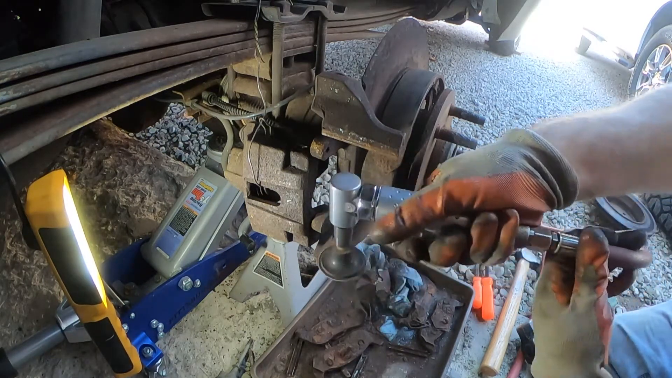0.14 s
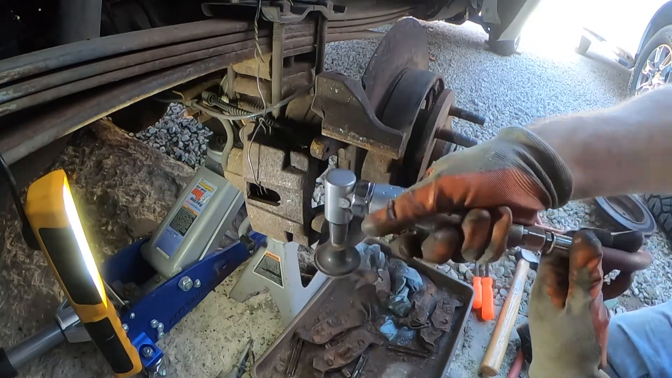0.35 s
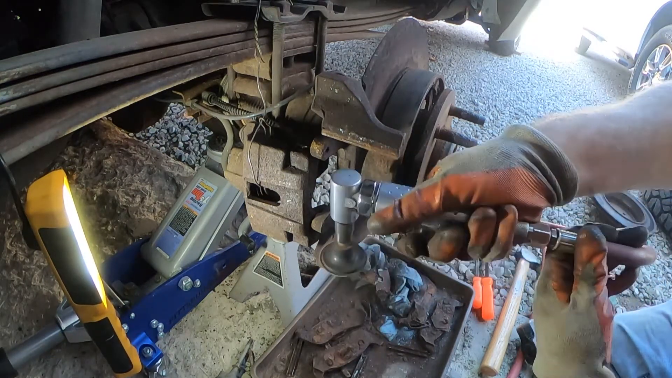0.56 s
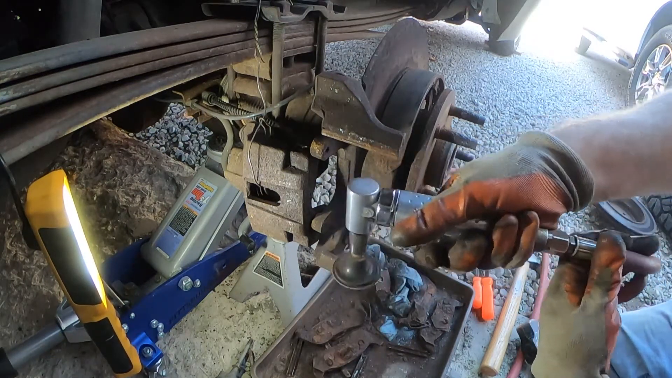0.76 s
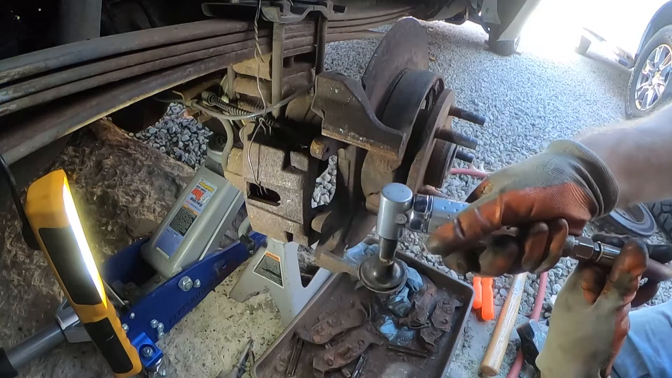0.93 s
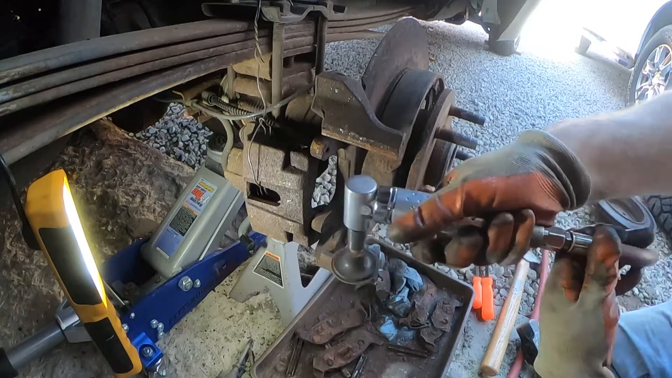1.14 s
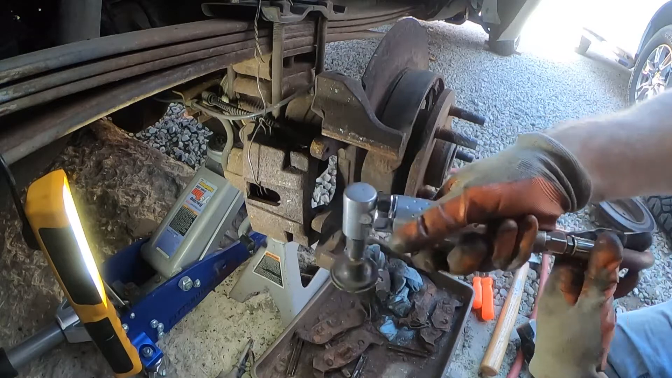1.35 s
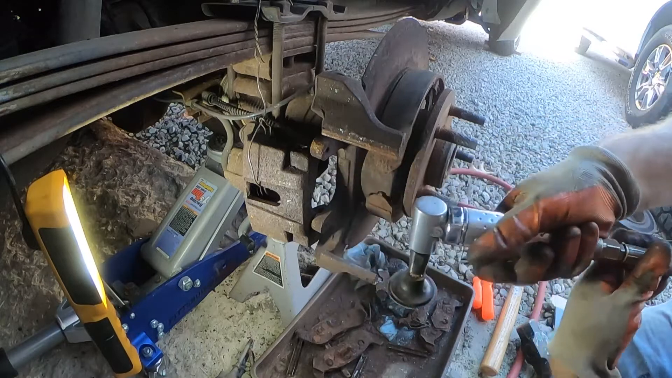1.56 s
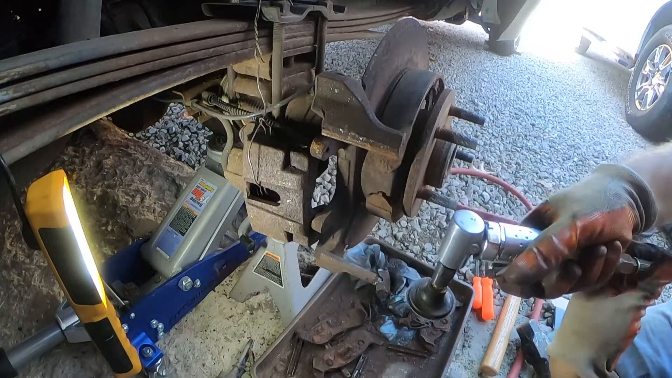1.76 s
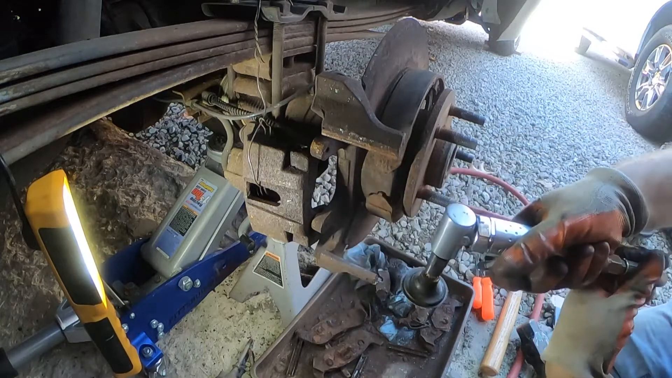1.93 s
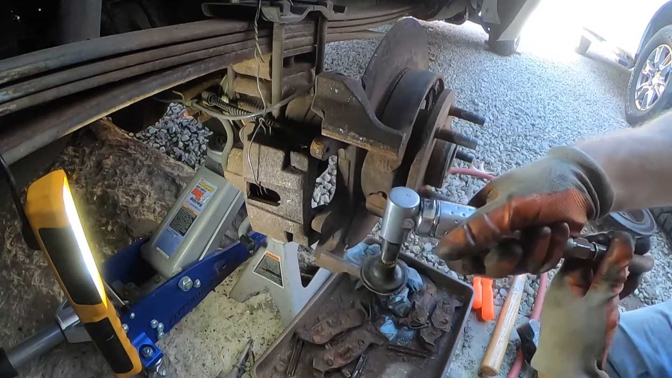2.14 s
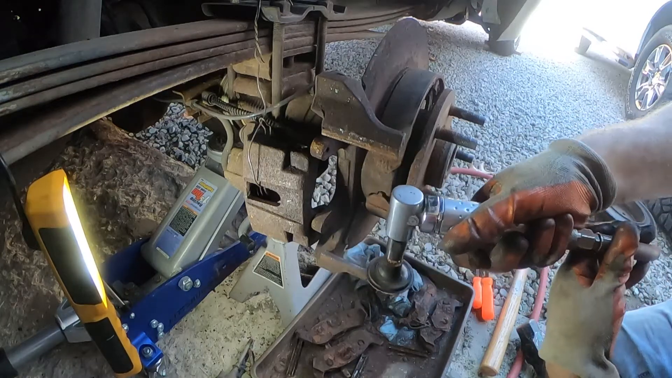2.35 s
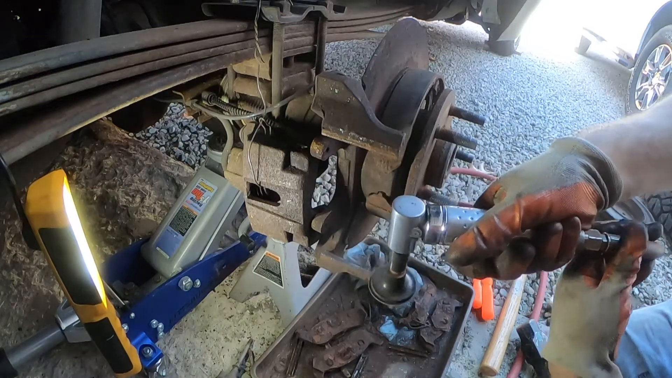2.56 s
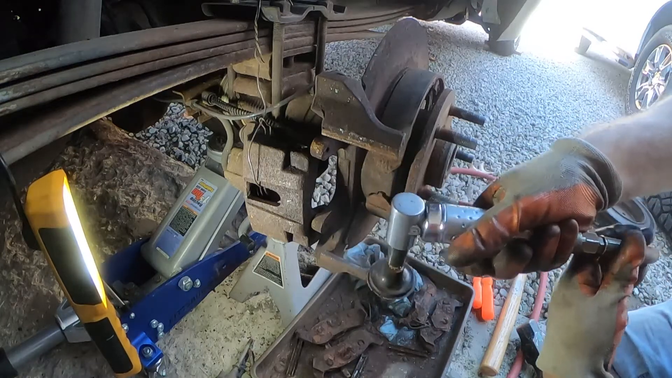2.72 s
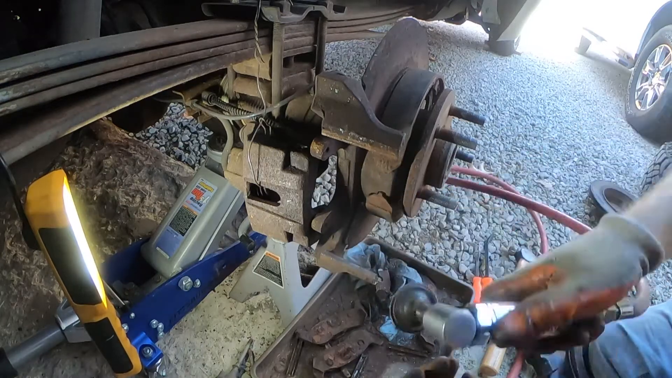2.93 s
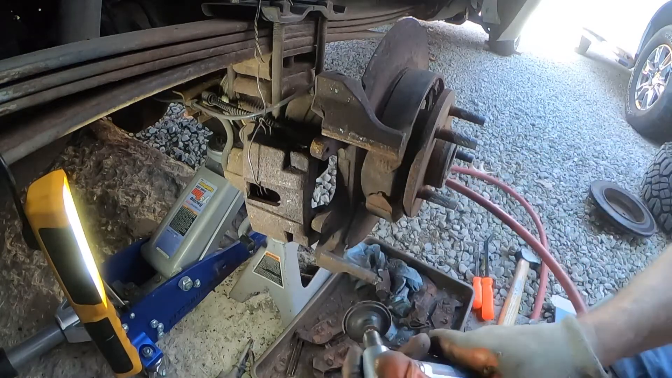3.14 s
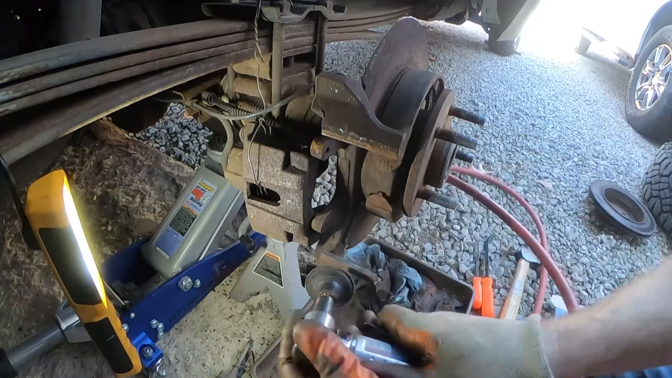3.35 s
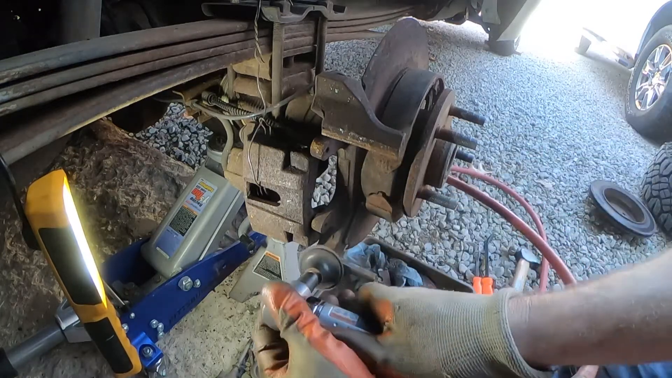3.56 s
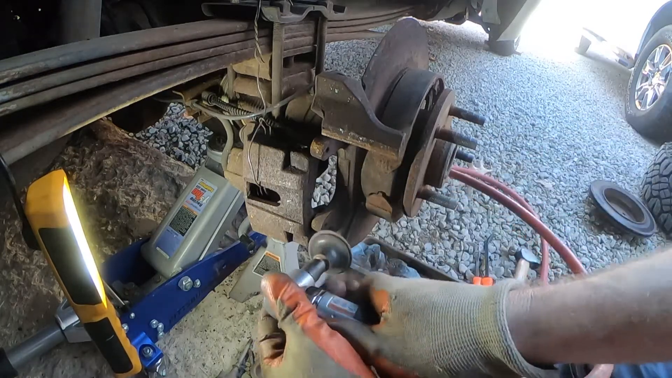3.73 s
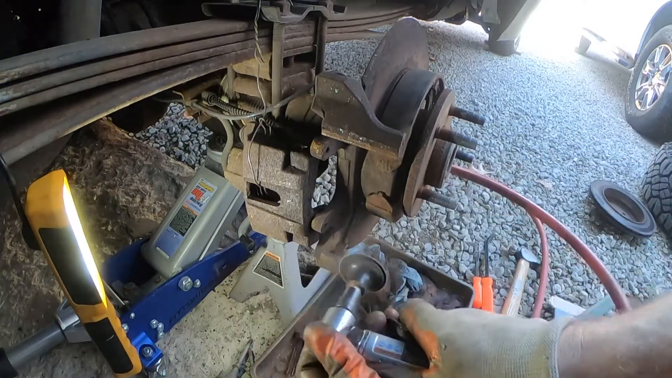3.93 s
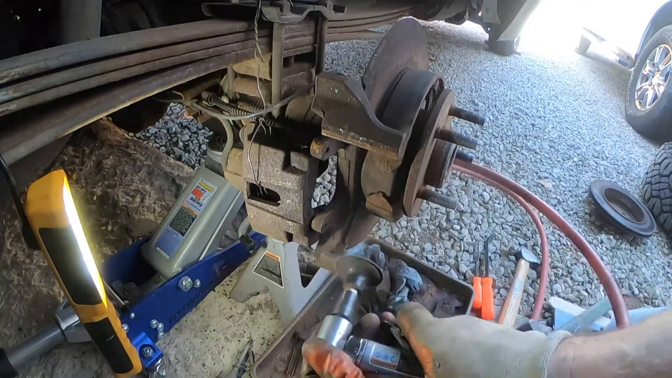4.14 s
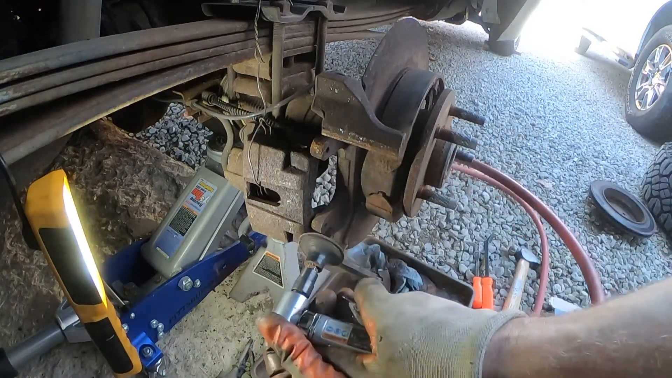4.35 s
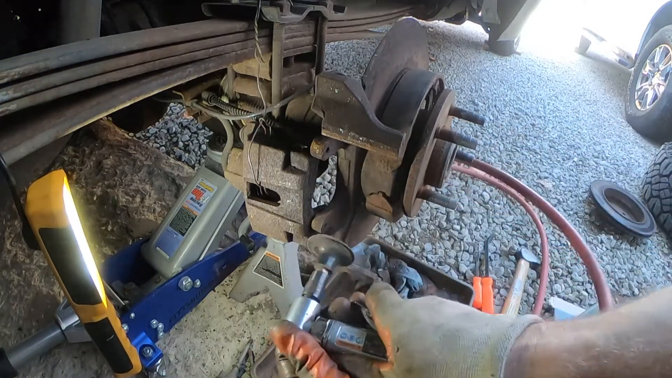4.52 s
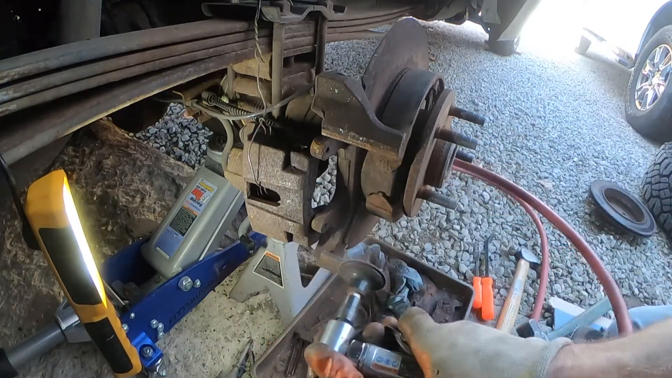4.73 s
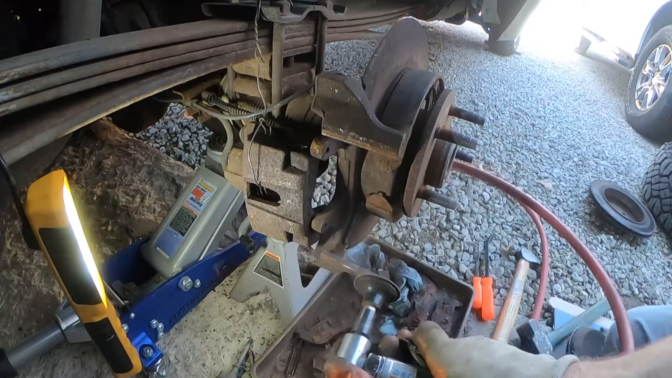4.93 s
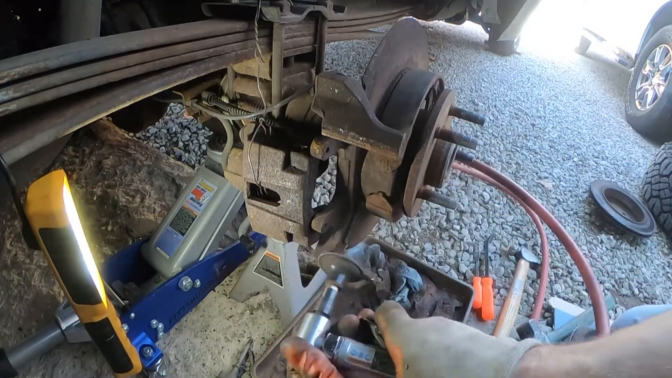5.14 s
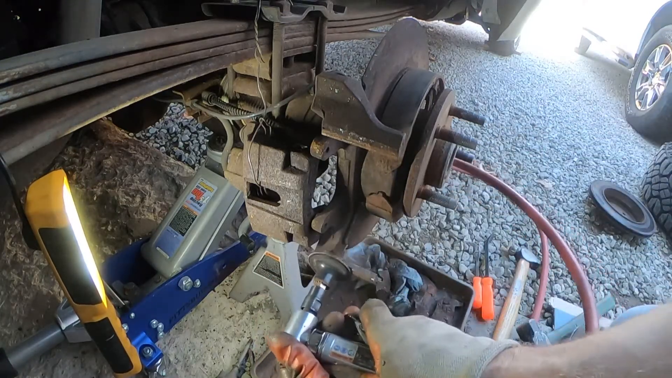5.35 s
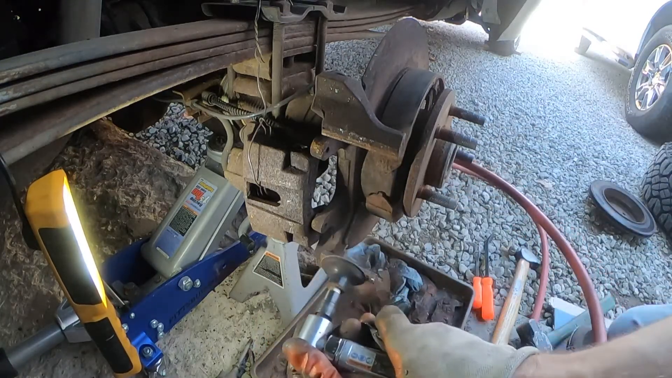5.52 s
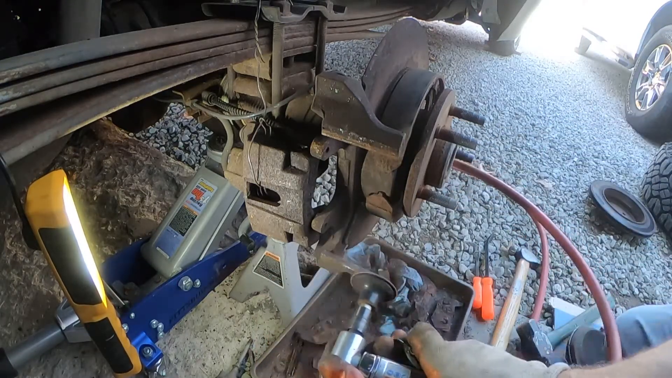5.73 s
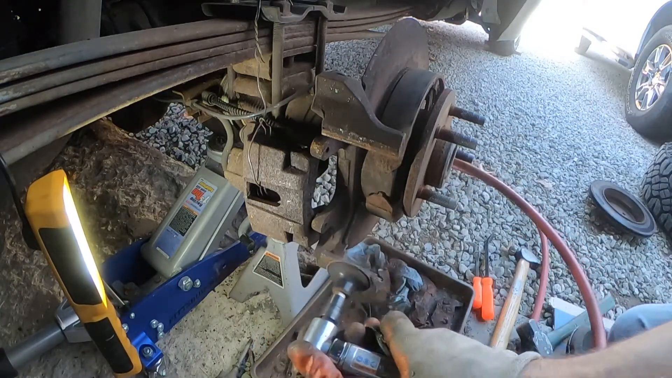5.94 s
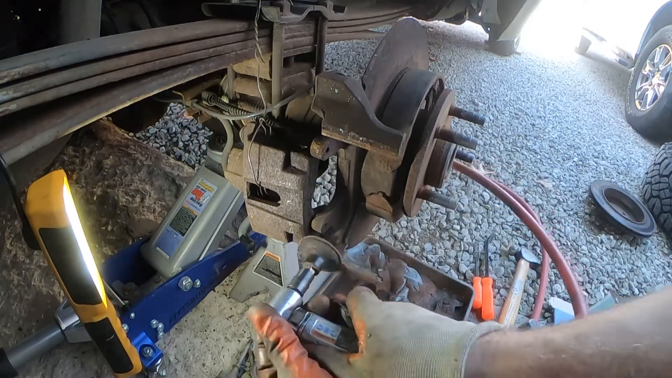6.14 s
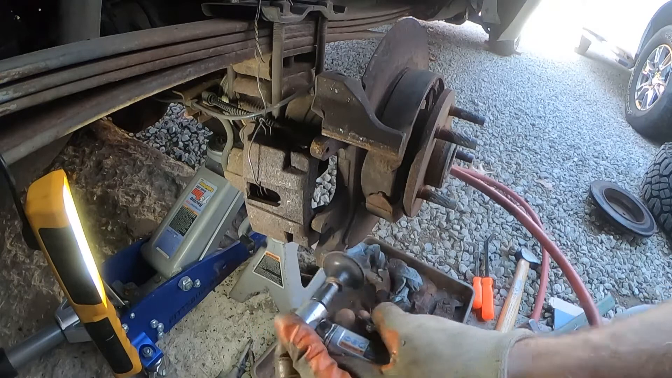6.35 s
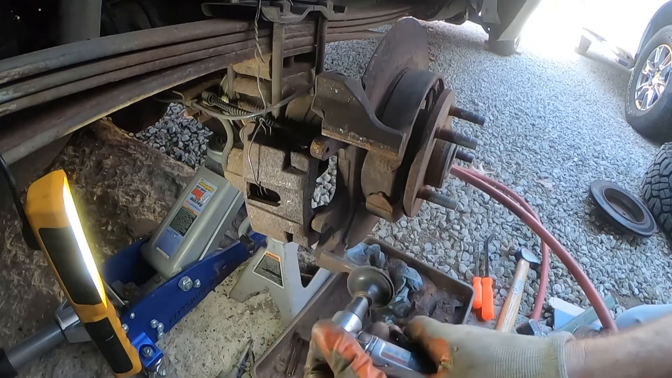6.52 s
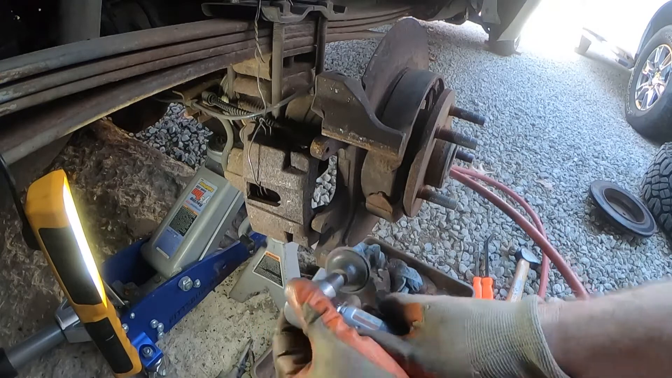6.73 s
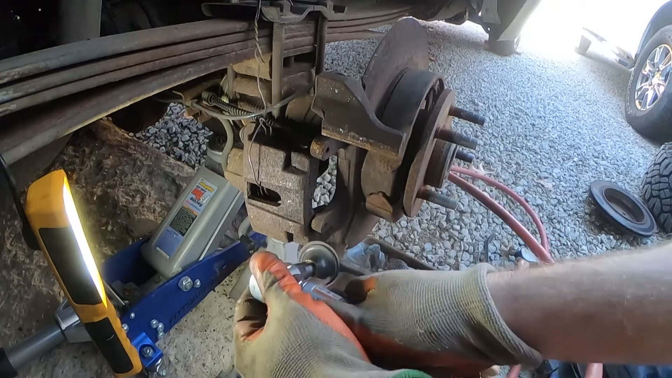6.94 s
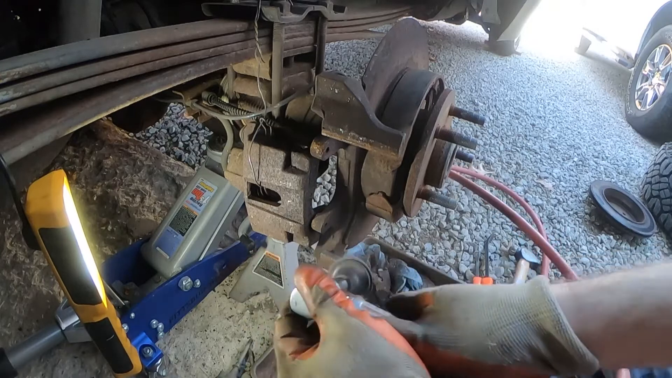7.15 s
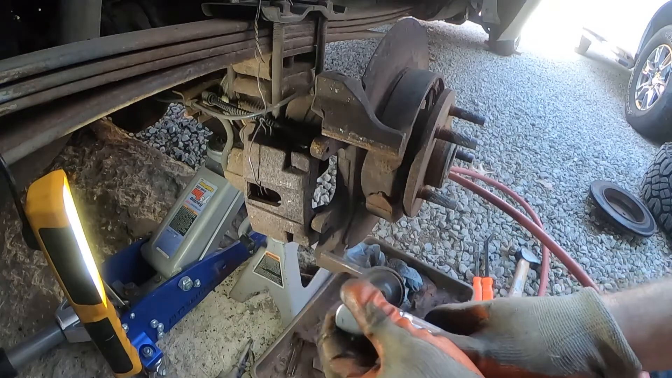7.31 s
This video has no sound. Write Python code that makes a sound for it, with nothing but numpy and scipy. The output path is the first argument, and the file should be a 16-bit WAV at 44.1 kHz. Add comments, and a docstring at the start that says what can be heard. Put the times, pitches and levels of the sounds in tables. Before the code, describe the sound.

Close up, a small air grinder already running whines unevenly and winds down, then revs briefly again. Air leaks in a hiss, a hard metallic clack lands, and a short rev follows. After a hissing pause come five more revs, rougher, with chatter on the way up and down and a buzzing rasp near top speed. Sheltered outdoor spot under a vehicle, short reflections, close stereo microphone.

```python
"""Air-driven die grinder revved near a rusty bracket

An angle die grinder with a small sanding disc is revved in eight bursts, the first already running.
Its vanes chop the air into a harmonic whine, and turbulent exhaust hisses in puffs at the vane rate.
Later the head chatters at middling speed and the disc rasps near the top, as random impacts on resonances.
Leaking air is shaped noise with moving resonances; one clack excites decaying modes, then a dull rumble."""
import sys
import numpy as np
from scipy import signal
from scipy.fft import rfft, irfft
from scipy.io import wavfile
from scipy.ndimage import uniform_filter1d, minimum_filter1d

SR = 44100
rng = np.random.default_rng(int(sys.argv[2]) if len(sys.argv) > 2 else 0)


def wav_record(signal):
    """Record a signal, one row per channel, as 16-bit PCM in the file named by sys.argv[1]."""
    frames = np.transpose(np.atleast_2d(signal))
    bounded = np.clip(frames, -1, 1)
    # unit amplitude maps onto the largest positive 16-bit level
    quanta = np.round(bounded * 32767).astype(np.int16)
    wavfile.write(sys.argv[1], SR, quanta)


N = 329868
T = np.arange(N) / SR  # t/s
HZ = np.fft.rfftfreq(N, 1 / SR)  # f/Hz

# Presses of the throttle: [opens t/s, shut t/s, attack/s, release/s,
# relative air level/dB, whine offset/dB, start-up jolt level/dB]
BURSTS = [(-.2, 0.948, .03, 0.17, -25, -4, -60), (1.017, 1.443, 0.049, 0.21, -25, -4, -53),
          (2.395, 2.759, .018, .17, -23.5, -1, -45), (3.518, 4.423, .012, 0.094, -23.5, -2, -48),
          (4.535, 5.322, .03, 0.11, -25, -2, -42), (5.459, 6.241, .024, 0.11, -24, -0.5, -49),
          (6.335, 7.02, .035, 0.13, -23, -2, -39.5), (7.139, 7.53, 0.063, 0.093, -25.5, -1, -38)]
SHUT_DB, RELEASE_BEND = -22, 1.58  # air at the ends of a press against its hold; the release starts gently

# Motor speed, one track per burst: [t/s, vane rate f/Hz]
SPEEDS = [
    [(0.0, 600.5), (0.082, 673), (0.116, 690), (0.188, 570.6), (0.352, 628), (0.384, 537), (0.41, 481),
     (0.496, 464), (0.608, 626.1), (0.71, 415.5), (0.776, 345.6), (0.816, 268), (0.87, 156.1)],
    [(1.07, 131.3), (1.106, 279.3), (1.156, 454.5), (1.244, 622.6), (1.312, 395), (1.36, 192)],
    [(2.42, 137.8), (2.44, 280), (2.472, 495), (2.55, 680.5), (2.598, 579), (2.66, 286), (2.7, 218.7)],
    [(3.53, 100.9), (3.544, 187.8), (3.566, 325.7), (3.598, 528), (3.656, 700), (3.714, 731),
     (3.822, 267.8), (3.914, 418.6), (4.076, 613), (4.158, 666.7), (4.32, 467.6), (4.348, 370.7),
     (4.38, 262)],
    [(4.59, 98.5), (4.618, 169.2), (4.668, 296.4), (4.722, 459.8), (4.776, 585.4), (5.068, 734),
     (5.124, 660), (5.224, 380), (5.254, 279), (5.29, 154.4)],
    [(5.49, 101.1), (5.514, 205.4), (5.548, 360.6), (5.612, 497), (5.76, 685.4), (5.922, 693.4),
     (6.044, 535.3), (6.13, 297.7), (6.2, 123.1)],
    [(6.38, 105.2), (6.404, 175.6), (6.438, 275.3), (6.486, 409.2), (6.548, 588.9), (6.616, 637),
     (6.678, 631.4), (6.9, 480.7), (6.96, 294.9)],
    [(7.21, 107.0), (7.248, 246.1), (7.316, 485.9), (7.384, 602.4), (7.48, 282.4)],
]
EDGE_SLOPE_HZ_PER_S, CREEP_HZ = 2600, 40.17  # slope of the vane rate outside each track, and its lower bound
INERTIA_S = 0.013  # the rotor rounds off every change of speed
COAST_HZ_PER_S = 7500  # fall of the vane rate that counts as full coasting
TURNED_S = 3.73  # the tool is turned over from here on

# Whine fundamental: [vane rate f/Hz, upright relative level/dB, turned-over relative level/dB]
WHINE = [(100, -35, -55), (199.37, -41.5, -40.5), (284.8, -41.5, -45.5), (398, -19.5, -27),
         (483, -27.5, -30), (560, -21, -23.5), (620, -25.5, -25), (750.3, -18, -26.5)]
COAST_DB, OVERTONE_COAST_DB = -9, -12.5  # change of the whine, and of its overtones, at full coasting
FLARE_S, FLARE_WIDTH_S, FLARE_DB = 2.598, 0.015, 13  # the whine flares once
# Vane harmonics leaving the exhaust port: [f/Hz, upright relative level/dB, turned-over relative level/dB]
OVERTONES = [(296, -40, -53.5), (600.3, -30, -29), (751.1, -37, -38), (1080, -35, -42.5),
             (1213, -29.5, -38), (1590, -30, -31.5), (2040, -36.5, -35.5), (2500, -34, -31),
             (4500, -41, -53)]
PHASE_JITTER_RAD, FLUTTER_DB, FLUTTER_HZ = 0.3, 1.5, 12

# Correlation of the two channels, general: [f/Hz, likeness from -1 to 1]
LIKENESS = [(60, 0.98), (600, 0.9), (1200, -0.43), (2400, 0.83), (4400, 0.8), (8000, -0.16), (15000, 0.22)]
# Exhaust spectrum: [f/Hz, relative spectral level/dB]
EXHAUST = [(30, -52), (65, -6.5), (130, -5.5), (300, -9.5), (600, -10), (900, -9.5), (1400, -3.5),
           (1800, 5), (2400, 3), (4000, 4.5), (6500, 3.5), (10000, 1), (11300, -8), (15500, -20)]
# Exhaust balance: [f/Hz, left minus right level/dB]
EXHAUST_SIDE = [(100, -1.5), (2400, 0), (8000, -1.5), (15000, -1)]
HISS_DIP_DB = -4  # the hiss dips while the disc rasps

# Leaking-air spectrum: [f/Hz, relative spectral level/dB]
LEAK_COLOUR = [(100, -10), (600, -15), (900, -10.5), (1300, -5.5), (2200, 2.5), (3300, 3.5), (4300, 3),
               (6000, 4), (7600, 6), (10200, 5), (11400, -4.5), (15500, -16.5)]
# Leaking-air balance: [f/Hz, left minus right level/dB]
LEAK_SIDE = [(100, 3), (1300, -10), (2400, -6), (4400, -1.5), (15000, -2.5)]
# Leaking-air channel correlation: [f/Hz, likeness from -1 to 1]
LEAK_LIKENESS = [(100, 0.94), (640, 0.73), (1300, -0.44), (2400, 0.23), (4400, 0.51), (7500, -0.58),
                 (15000, .05)]
# Surges of leaking air: [start t/s, end t/s, initial gain level/dB]
SURGES = [(1.483, 2.287, -32.5), (2.74, 3.65, -28.5), (6.106, 6.498, -37), (7.01, 7.5, -33.5)]
LEAK_DB, LEAK_RISE_S, LEAK_FALL_S, LEAK_SAG_DB_PER_S = -39, 0.14, 0.16, -9
SWING_S, SWING_WIDTH_S, SWING_HZ, SWING_DB = 3.0, 0.13, 1087, 3.5  # rise as the hand swings the tool round
JET_HZ, JET_DB, JET_WIDTH_HZ = 1742, -10, 500  # resting resonance, relative level, half-width
UPPER_JET_RATIO, UPPER_JET_DB = 1.55, -5.5  # a weaker resonance above it

# Low background rumble: [t/s, level/dB before the trim]
RUMBLE = [(0.0, -58), (1.39, -45), (2.04, -69), (2.23, -42.5), (3.27, -58), (3.56, -49.5), (3.69, -74),
          (3.75, -57.5), (7.48, -43)]
RUMBLE_TRIM_DB = 4.5
# Background spectrum: [f/Hz, relative spectral level/dB]
FLOOR = [(20, -45), (45, -17), (70, 2.5), (110, -7), (200, -21.5), (400, -17), (1000, -20), (4000, -16),
         (15000, -53)]

# Dull spectrum of the jolts and of the rumble after the clack: [f/Hz, relative spectral level/dB]
THUD = [(40, -10), (100, 16), (240, 11), (420, 2.5), (700, -19), (2000, -28), (8000, -78)]
JOLT_DELAY_S, JOLT_WIDTH_S = 0.1, 0.08
# Resonances of the hum and of the burr: [f/Hz, width f/Hz, relative level/dB]
HUM_MODES = [(248.8, 1.8, 7.5), (389, 63, -11.0)]
BURR_MODES = [(640, 84, 0)]

# Brief gear rattles as the throttle is eased: [start t/s, length t/s, gain level/dB]
RATTLES = [(0.122, 0.063, -26), (0.347, 0.064, -27), (0.607, 0.049, -26), (1.238, 0.054, -25),
           (3.71, 0.17, -37), (4.255, 0.14, -39)]
# Knocks of the chattering head: [f/Hz, relative spectral level/dB]
CHATTER = [(300, -41), (1500, -65), (2500, 3), (2950, 4.5), (3500, 13.5), (4000, -10.5), (4600, -48),
           (5200, -23), (6500, -29), (12000, -23)]
# Resonances of the head: [f/Hz, width f/Hz, relative level/dB]
HEAD_MODES = [(2950, 23, 10.5), (3189, 26, 12), (3520, 138.4, -33), (5210, 490, 0.5)]
# Bright ring of the head: [f/Hz, width f/Hz, relative level/dB]
BRIGHT_MODES = [(3940, 27, 2.7), (4056, 46, 2)]
CHATTER_DB, SLACK_DB = -26.5, 3  # base chatter gain; extra at the whirl rate while slowing
WHIRL_HZ, WHIRL_WIDTH_HZ, WHIRL_DB = 308, 250, 5  # vane rate of strongest chatter, its width, its rise

# The clack and its bounces: [t/s, blow level/dB]
CLACKS = [(2.167, -3.5), (2.171, -18), (2.178, -25), (2.189, -22)]
# Resonances of the clack: [f/Hz, width f/Hz, relative level/dB]
CLACK_MODES = [(1170, 240, -16), (1944, 81, 6), (2320, 320, 7.5), (3350, 210, 6.5), (4140, 310, -12)]
# Dull rumble after the clack: [t/s, level/dB]
THUD_SWELL = [(2.165, -78), (2.188, -32.5), (2.24, -35), (2.3, -42), (2.4, -57), (2.5, -90)]

# Rasping near top speed: [start t/s, end t/s, rasp gain/dB before its weight, bright-ring gain/dB]
RASPS = [(3.971, 4.223, -20.5, -32), (4.758, 5.15, -24.5, -29.5), (5.649, 6.0, -24.5, -29),
         (6.507, 6.753, -20.5, -33.5), (7.329, 7.518, -24, -25)]
RASP_EDGE_S = 0.047
# Rasp spectrum: [f/Hz, relative spectral level/dB]
RASP = [(100, -54), (240, -5), (500, 3), (1000, -43), (1400, 15), (1900, -10), (2400, 11), (3200, 21),
        (4100, -30.5), (4600, -52), (9000, -50)]
# Resonances of the disc: [f/Hz, width f/Hz, relative level/dB]
DISC_MODES = [(1809, 60, 0.5), (1964, 62, 4.5), (2332, 18, 2.5), (2770, 29, -5.5)]
IDLE_RASP_DB, IDLE_RING_DB = -34, -37  # gain floors of the disc and the bright ring

EDGE_HZ = 15550  # upper band limit


def amp(db):
    """Amplitude ratio from a level in decibels."""
    return 10 ** (np.asarray(db) / 20)


def unit(x):
    """Normalisation to unit root-mean-square value."""
    return x / np.sqrt(np.mean(x ** 2) + 1e-20)


def read(points):
    """Interpolation of a spectrum on a logarithmic frequency axis."""
    hz, value = np.transpose(points)
    return np.interp(np.log(HZ + 1), np.log(hz + 1), value)


def curve(rows, column):
    """Linear interpolation of one table column in time."""
    rows = np.asarray(rows)
    return np.interp(T, rows[:, 0], rows[:, column])


def bell(x, centre, width):
    """Gaussian bump of unit height."""
    return np.exp(-((x - centre) / width) ** 2)


def fade_in(s):
    """Linear gain ramp that opens at a given moment."""
    return np.clip((T - s) / 0.022, 0, 1)


def spell(start, end, rise_s, fall_s):
    """Trapezoidal gain: rise, hold and fall between two moments."""
    return np.clip(np.minimum((T - start) / rise_s, (end - T) / fall_s), 0, 1)


def noise():
    """Two independent white Gaussian noises."""
    return rng.standard_normal((2, N))


def wander(rate_hz):
    """Low-passed random fluctuation of unit size."""
    spectrum = rfft(rng.standard_normal(N))
    return unit(irfft(spectrum / (1 + (HZ / rate_hz) ** 4), N))


def ringing(modes):
    """Modal superposition: a frequency response of resonances, dull above the highest."""
    top_hz = max(hz for hz, _, _ in modes)
    response = sum(amp(db) / (1 + 2j * (HZ - hz) / width) for hz, width, db in modes)
    return response / (1 + (HZ / top_hz / 1.05) ** 8)


def colour(drive, response, side_db=0, likeness=LIKENESS):
    """Linear filtering of two unrelated drives, mixed to a set correlation between the channels."""
    a, b = rfft(drive) * response
    same = np.clip(read(likeness), -1, 1)
    mid = a * np.sqrt(1 + same)
    side = b * np.sqrt(1 - same)
    left = (mid + side) * amp(side_db / 2)
    right = (mid - side) * amp(-side_db / 2)
    return unit(irfft(np.array([left, right]), N))


def small_impacts(turns, per_s, spread_db, throb):
    """Random point process of small impacts, crowded on one side of each shaft turn."""
    crowding = 1 + np.clip(throb, 0, 1) * np.cos(2 * np.pi * turns)
    hits = rng.random((2, N)) < per_s / SR * crowding
    return hits * noise() * amp(spread_db * wander(630))


def garage(x, t60, wet_db):
    """Diffuse reverberation: short, exponentially decaying echoes from the underbody and the floor."""
    t = T[:SR // 2]
    tail = rng.standard_normal((2, len(t))) * amp(-60 * t / t60) * (t > 0.001)
    tail = tail + 0.52 * tail[::-1]  # each channel shares some of the other's echoes
    wet = signal.fftconvolve(x, tail / np.linalg.norm(tail[0]), axes=1)[:, :N]
    return x + amp(wet_db) * wet


def echoed(x, share):
    """Early reflections off the hand and the hub give the hiss a hollow grain."""
    return unit(garage(x, t60=0.035, wet_db=20 * np.log10(share)))


def press(start, end, attack_s, release_s):
    """Gain of one throttle press: attack, hold and release shaped in decibels."""
    opening = np.clip(1 - (T - start) / attack_s, 0, 4)
    closing = np.clip(1 - (end - T) / release_s, 0, 4)
    return amp(SHUT_DB * (opening + closing ** RELEASE_BEND))


def airflow():
    """Throttled flow: relative level in dB of the air let through."""
    flow = sum(amp(db) * press(*timing) for *timing, db, _, _ in BURSTS)
    return 20 * np.log10(flow + 1e-4)


def speed():
    """Rotor inertia: vane rate in Hz, smoothed, and falling to a creep between bursts."""
    revs = []
    for rows in SPEEDS:
        time_outside = abs(T - np.clip(T, rows[0][0], rows[-1][0]))
        revs.append(curve(rows, column=1) - EDGE_SLOPE_HZ_PER_S * time_outside)
    fastest = np.maximum(np.max(revs, axis=0), CREEP_HZ)
    vane_hz = uniform_filter1d(fastest, size=max(round(INERTIA_S * SR), 1))
    return vane_hz * (1 + 0.006 * wander(24.43))


def slowing(vane_hz):
    """Deceleration: 0 while the motor holds or gains speed, 1 when it coasts down."""
    gain_hz_per_s = uniform_filter1d(np.gradient(vane_hz) * SR, size=900)
    return np.clip(-gain_hz_per_s / COAST_HZ_PER_S, 0, 1)


def facing(table, hz):
    """Directivity: level in dB at a frequency, for the way the tool is held at each moment."""
    points_hz, upright_db, turned_db = np.transpose(table)
    turned = fade_in(TURNED_S)
    upright_part = (1 - turned) * np.interp(hz, points_hz, upright_db)
    return upright_part + turned * np.interp(hz, points_hz, turned_db)


def running(air_db):
    """Drive gain: silent before the later bursts, then following the air down to a low floor."""
    return fade_in(3.5) * np.clip(amp(air_db + 25), 0.03, 1)


def rasping():
    """Rasp spells: how fully the disc rasps (0-1), and the gains of its rasp and of the bright ring."""
    half = RASP_EDGE_S / 2
    spells = np.array([spell(start - half, end + half, RASP_EDGE_S, RASP_EDGE_S) for start, end, _, _ in RASPS])
    _, _, rasp_db, ring_db = np.transpose(RASPS)
    return spells.sum(0), amp(rasp_db) @ spells, amp(ring_db) @ spells


def whine(turns, vane_hz, air_db):
    """Periodic interruption: four vanes chop the air each turn; unequal vanes add weak shaft orders."""
    vanes = 4 * turns
    coasting = slowing(vane_hz)
    throttle = np.clip(amp(air_db + 28), 0, 1) ** 2 * amp(OVERTONE_COAST_DB * coasting)

    burst_db = sum(db * (T > start) * (T < end) for start, end, _, _, _, db, _ in BURSTS)
    flare_db = FLARE_DB * bell(T, FLARE_S, FLARE_WIDTH_S)
    whine_db = facing(WHINE, vane_hz) + burst_db + COAST_DB * coasting + flare_db
    # the channels differ slightly in phase (rad) and level (dB)
    tone = np.cos(2 * np.pi * vanes + np.array([[0.2], [-0.2]])) * amp([[-0.7], [0.7]])
    out = amp(whine_db) * (1 + 0.02 * wander(53)) * tone

    for multiple in range(2, 9):
        overtone_db = facing(OVERTONES, multiple * vane_hz) - 2 * (multiple - 2)
        level = throttle * amp(overtone_db + FLUTTER_DB * wander(FLUTTER_HZ))
        cycles = multiple * vanes + rng.random((2, 1)) / 7
        out += level * np.cos(2 * np.pi * cycles + PHASE_JITTER_RAD * wander(52))
    for order in range(10, 26):
        level = throttle * vane_hz / 650 * amp(-47.0) * wander(11.6)
        out += level * np.cos(2 * np.pi * (order * turns + rng.random((2, 1)) / 5))
    driven = np.clip(amp(air_db + 37), 0, 1) ** 2
    return np.sqrt(2) * out * driven


def exhaust(turns, air_db):
    """Jet turbulence, amplitude-modulated into one puff for each vane and one weaker per turn."""
    puffs = 1 + 0.068 * np.cos(8 * np.pi * turns) + 0.048 * np.cos(2 * np.pi * turns)
    gusts = amp(0.87 * wander(125))
    air = colour(noise() * puffs * gusts, amp(read(EXHAUST)), read(EXHAUST_SIDE))
    return echoed(air, share=0.39) * amp(air_db + 3.0)


def leak():
    """Jet noise of a steady escape that surges at times, with two broad, moving resonances."""
    swing = bell(T, SWING_S, SWING_WIDTH_S)
    jet_cycles = np.cumsum(JET_HZ + SWING_HZ * swing) / SR
    band = 1 / (1 + (HZ / JET_WIDTH_HZ) ** 3)

    def resonance(ratio):
        """Frequency translation: low-passed complex noise is shifted to a moving centre."""
        slow_noise = colour(noise(), band) + 1j * colour(noise(), band)
        return unit((slow_noise * np.exp(2j * np.pi * ratio * jet_cycles)).real)

    jet = resonance(1) + amp(UPPER_JET_DB) * resonance(UPPER_JET_RATIO)
    jet = jet * amp([[-3], [2]]) * amp(JET_DB + SWING_DB * swing)  # left, right level/dB
    hiss = colour(noise(), amp(read(LEAK_COLOUR)), read(LEAK_SIDE), LEAK_LIKENESS)
    hiss = echoed(hiss, share=0.4) * amp(0.5 + 2.4 * swing)
    surges = 0
    for start, end, db in SURGES:
        sagging = amp(db + LEAK_SAG_DB_PER_S * (T - start))
        surges = surges + sagging * spell(start, end, LEAK_RISE_S, LEAK_FALL_S)
    return (amp(LEAK_DB) + surges) * (hiss + jet)


def rumble():
    """Filtered random noise: a low, slightly uneven background."""
    uneven_db = 2 * wander(5)
    level_db = curve(RUMBLE, column=1) + RUMBLE_TRIM_DB + uneven_db
    return amp(level_db) * colour(noise(), amp(read(FLOOR)))


def shake(vane_hz, air_db, rasp):
    """Forced vibration: start-up jolts, an unbalanced disc's hum at speed, a dull burr at low speed."""
    jolt = sum(amp(db) * bell(T, start + JOLT_DELAY_S, JOLT_WIDTH_S) for start, *_, db in BURSTS)
    near_resonance = 1 / (1 + ((vane_hz - 640) / 45) ** 2)
    hum = near_resonance * rasp * amp(-16.5) * colour(noise(), ringing(HUM_MODES))
    slow = bell(vane_hz, 200, 71) * np.clip(amp(air_db + 34.5), 0, 1) ** 2
    burr = amp(-37.5) * slow * colour(noise(), ringing(BURR_MODES))
    return jolt * colour(noise(), amp(read(THUD))) + hum + burr


def head(turns, vane_hz, air_db, bright_ring):
    """Impact excitation of the angle head: brief gear rattles, and later chatter and a bright ring."""
    knocks = colour(small_impacts(turns, per_s=2600, spread_db=-4.5, throb=0.46), amp(read(CHATTER)))
    ring = colour(small_impacts(turns, per_s=2400, spread_db=-10.0, throb=0.8), ringing(HEAD_MODES))
    bright = colour(small_impacts(turns, per_s=5400, spread_db=7, throb=0.32), ringing(BRIGHT_MODES))
    # flat-topped gain over each rattle
    rattle = sum(amp(db) * np.exp(-(2 * (T - s) / length - 1) ** 6) for s, length, db in RATTLES)
    whirl_db = bell(vane_hz, WHIRL_HZ, WHIRL_WIDTH_HZ) * (WHIRL_DB + SLACK_DB * slowing(vane_hz))
    chatter_gain = fade_in(TURNED_S) * amp(CHATTER_DB + whirl_db)
    chatter = chatter_gain * (amp(-8) * knocks + amp(-3.5) * ring)
    ringing_on = np.maximum(amp(IDLE_RING_DB), bright_ring) * bright
    return running(air_db) * (chatter + ringing_on) + rattle * (knocks + amp(3) * bright)


def clack():
    """Impulse response of damped modes: a hard knock with weaker bounces, then a dull rumble."""
    blows = np.zeros(N)
    for s, db in CLACKS:
        blows[round(s * SR)] = amp(db)
    ring = irfft(ringing(CLACK_MODES), N)[:SR // 2]
    ring = signal.sosfilt(signal.butter(4, 6500, fs=SR, output="sos"), ring)
    knock = signal.fftconvolve(blows, ring / abs(ring).max())[:N]
    swell = amp(curve(THUD_SWELL, column=1))
    return amp(2.0) * knock + swell * colour(noise(), amp(read(THUD)))


def disc(turns, air_db, rasp):
    """Random impacts: the fast disc and angle head rasp, and the disc rings."""
    scrape = colour(small_impacts(turns, per_s=2800, spread_db=10.5, throb=0.29), amp(read(RASP)))
    ring = colour(small_impacts(turns, per_s=4300, spread_db=3.0, throb=0.76), ringing(DISC_MODES))
    rasp_gain = amp(IDLE_RASP_DB) + 0.5 * rasp
    return running(air_db) * rasp_gain * (scrape + amp(1.0) * ring)


def scene():
    """Superposition: throttle and shaft speed drive the tool's sounds; leak, clack and rumble add to them."""
    vane_hz = speed()
    turns = np.cumsum(vane_hz) / SR / 4  # four vanes per shaft turn
    air_db = airflow()
    rasp_part, rasp, bright_ring = rasping()
    motor = garage(whine(turns, vane_hz, air_db) + clack(), t60=0.11, wet_db=-6)
    motor = motor + exhaust(turns, air_db + HISS_DIP_DB * rasp_part)
    metal = shake(vane_hz, air_db, rasp) + head(turns, vane_hz, air_db, bright_ring) + disc(turns, air_db, rasp)
    return motor + metal + leak() + rumble()


def record(dry):
    """Peak limiting by a fast smoothed gain, then a linear-phase band limit."""
    gain = np.minimum(amp(-9.0) / (abs(dry).max(axis=0) + 1e-9), 1)
    gain = uniform_filter1d(minimum_filter1d(gain, size=160), size=160)
    low_pass = signal.firwin(511, EDGE_HZ, window=("kaiser", 9), fs=SR)
    return signal.oaconvolve(dry * gain, low_pass[None], "same")


dry = scene()
out = record(dry)
wav_record(out)
```